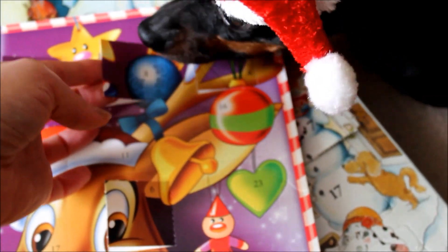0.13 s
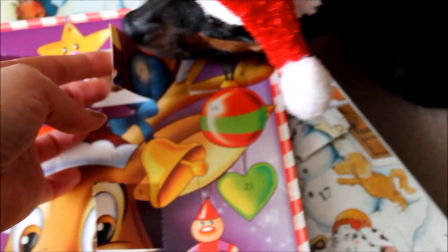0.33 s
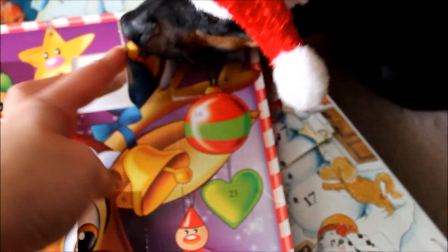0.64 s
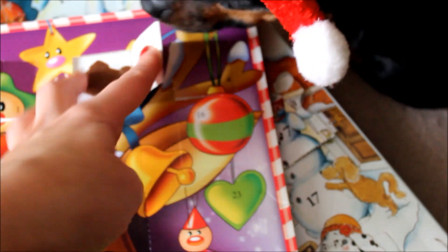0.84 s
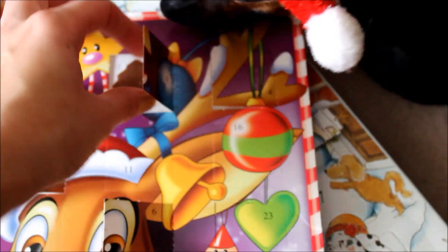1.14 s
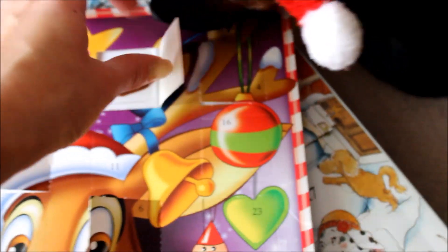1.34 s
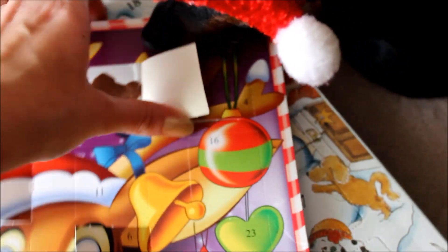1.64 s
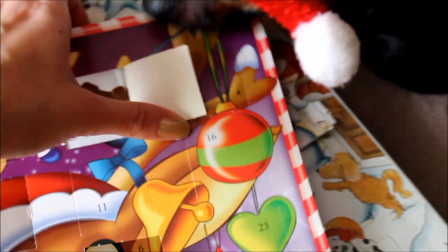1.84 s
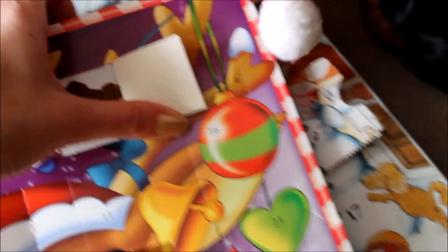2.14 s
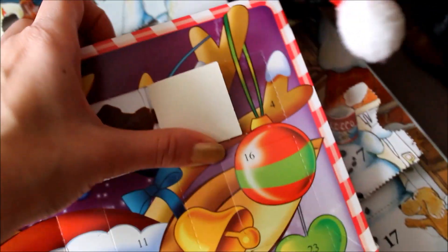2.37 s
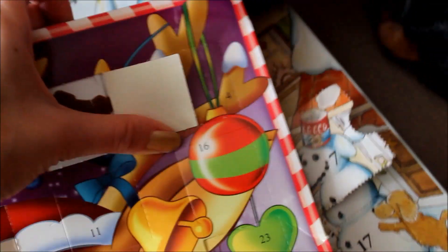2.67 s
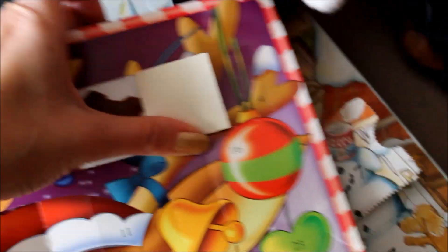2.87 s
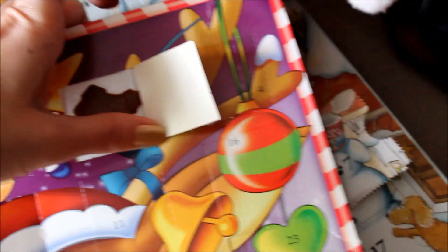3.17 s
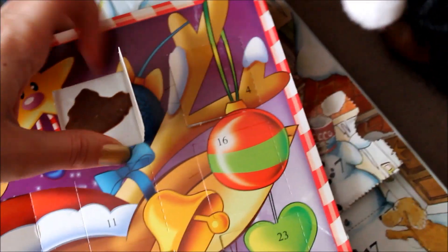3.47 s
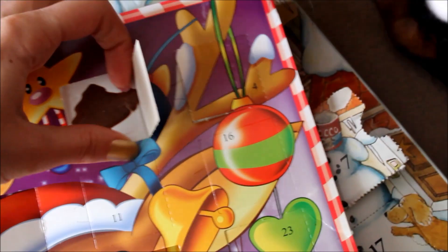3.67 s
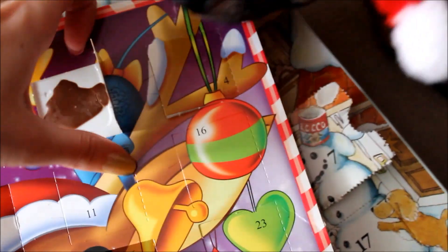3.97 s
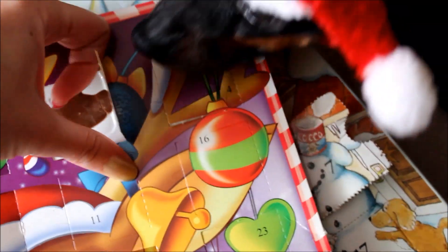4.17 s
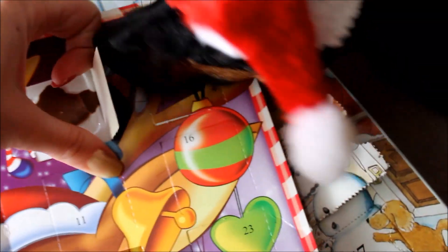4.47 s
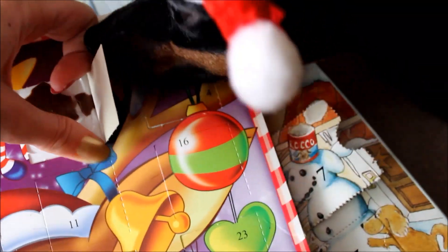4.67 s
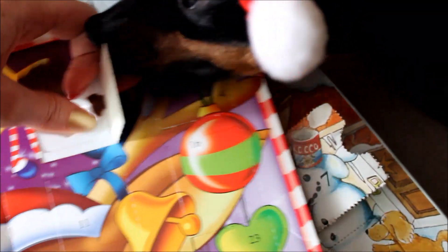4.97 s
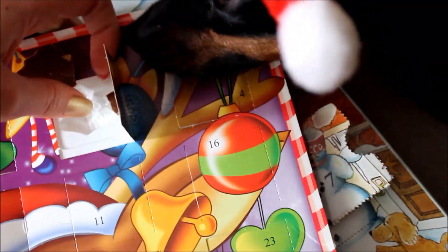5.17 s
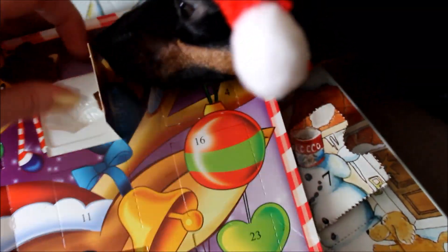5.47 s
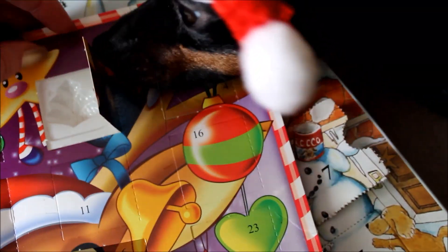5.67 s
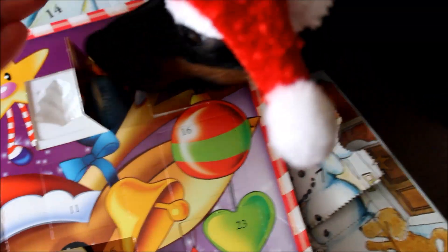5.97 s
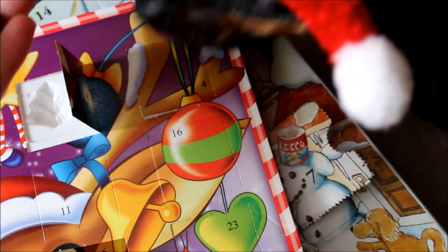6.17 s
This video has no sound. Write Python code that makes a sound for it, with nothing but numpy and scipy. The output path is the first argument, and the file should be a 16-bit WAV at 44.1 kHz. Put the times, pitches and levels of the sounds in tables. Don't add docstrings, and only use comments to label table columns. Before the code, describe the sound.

Close, dry crinkling of a thin cardboard box: perforations tick, hard creases pop loudly, then brittle plastic is bent and fades into small rustles.

```python
import sys
import numpy as np
from scipy import signal
from scipy.fft import rfft, irfft
from scipy.io import wavfile
from scipy.ndimage import uniform_filter1d

SR = 44100
rng = np.random.default_rng(int(sys.argv[2]) if len(sys.argv) > 2 else 0)


def unload_audio(sound):
    columns = np.transpose(np.atleast_2d(sound))
    steps = np.round(np.clip(columns, -1, 1) * 32767)
    wavfile.write(sys.argv[1], SR, steps.astype(np.int16))


def elevation(decibels):
    levels = np.asarray(decibels, float)
    return 10 ** (levels / 20)


N = 278271
TIME = np.arange(N) / SR

# lowest_hz, highest_hz, ring_t60_s, gain_db
BOX_PARTS = [
    (254.4, 1900, 0.038, 1),
    (1090, 4480, 0.029, -2.5),
    (4360, 12000, 0.019, -1.5),
]
# lowest_hz, highest_hz, ring_t60_s, gain_db
TRAY_PARTS = [
    (420, 1900, 0.03, 0),
    (1090, 5600, 0.022, -1.5),
    (4800, 13500, 0.019, -1),
]
# centre_hz, width_hz, level_db
BOX_MODES = [(520, 150, -12), (640, 120, 22), (1270, 67, -10.5), (1640, 270, 13.5), (2350, 180, -10)]
# start_s, card_db, film_over_card_db, clear_ring_hz, clear_ring_peak_db
FLAP_SNAPS = [(0.045, -24.5, -1, 684, -37), (0.313, 1.5, -3.5, 584, -10), (0.319, -17, 4.5, 2120, -20),
              (0.332, -19.5, 8, 640, -49), (1.09, -26, 0, 1970, -27), (1.213, -16.5, -2, 685, -38),
              (1.223, -19.5, -3, 1670, -34), (1.633, -19.5, -12, 555, -28.5),
              (1.802, -22, -20, 1410, -16.5), (1.819, -16, -14, 1430, -19.5),
              (2.016, -14, -9.5, 615, -24.5), (2.105, -10, -5.5, 1770, -14.5),
              (2.119, -12, -1.5, 2950, -15), (2.213, -0.5, -13.5, 2996, 7), (2.508, 2, -1, 2050, -6),
              (2.5085, -30, 1, 1080, -9), (2.69, -5, -1, 2680, -8), (2.737, -21, 6, 4000, -32),
              (2.758, 0, -8, 1250, -5), (2.7595, -35, 1, 640, -6), (2.759, -26, 3, 2080, 1),
              (2.953, -9.5, 9.5, 6570, -6.5), (3.037, -18, 8, 8000, -23), (3.043, -17.5, 3, 1520, -45),
              (3.16, -21, -4, 2260, -23)]
TRAY_SNAPS = [(3.399, -19, 14, 6100, -9), (3.4, -38, 2, 4100, -8), (3.484, -19.5, 0, 8060, -11.5),
              (3.892, -23, 2, 1570, -21.5), (4.028, -21, -7, 1380, -25), (4.045, -17, -2, 2300, -37),
              (4.058, -16.5, -1, 3600, -37), (4.249, -19, -17, 1900, -24), (4.325, -19.5, -14, 677, -20.5),
              (4.487, -10.5, -17, 2050, -38), (4.492, 0, 1, 5330, -2), (4.603, -18.5, -9.5, 760, -39),
              (4.627, -14, -4, 1670, -14.5), (4.631, -10, -9.5, 1700, -14), (4.645, -18.5, -9, 1560, -41),
              (4.71, -10, -21, 3000, -17), (4.804, -14, -23, 1900, -21.5), (4.838, -11.5, 0, 4500, -11),
              (4.871, -16, -20, 1730, -22), (4.915, -15.5, -4, 1060, -39), (4.932, -17, -12, 2600, -23),
              (4.953, -5, -2, 4800, -6), (5.143, -16.5, -1, 2220, -26), (5.604, -20, 1, 1550, -21.5)]
# start_s, peak_db, film_over_peak_db, clear_ring_hz
TEAR_TICKS = [(0.194, -52, -1, 1100), (0.221, -38.5, 1, 4160), (0.258, -37, 1, 4240),
              (0.471, -40, -19, 1690), (0.489, -27.5, -20, 1460), (0.513, -29, -22, 1420),
              (0.538, -36, 5, 5030), (0.565, -24.5, -13, 1500), (0.82, -30, 0, 2080),
              (0.843, -20, -18.5, 1500), (0.86, -32.5, -3, 470), (0.911, -34, 5, 430),
              (0.975, -34, 2.5, 2010), (0.991, -32, -12, 414), (1.023, -29, -19.5, 584),
              (1.236, -26, 0, 510), (1.295, -26.5, -17, 487), (1.351, -31, -17, 513), (1.374, -38, 1, 550),
              (1.503, -32, 5, 455), (1.578, -22, -6, 2000), (1.801, -19, -20, 480), (1.141, -27, -12, 1630),
              (1.161, -31, -12, 2800), (1.607, -30, -21, 573), (1.649, -36, 9, 525), (1.681, -27, -12, 745),
              (1.712, -18, -21, 1410), (1.87, -26.5, -17, 515), (1.902, -29, -14, 1580)]
FOLD_TICKS = [(2.385, -30, -15, 1010), (2.397, -33, -22, 1370), (2.404, -40, -32, 554),
              (2.412, -31, -10, 610), (2.421, -29, -26, 640), (2.438, -34, -32, 660),
              (2.452, -29.5, -9, 664), (2.466, -23, -14, 1650), (2.851, -37, 2, 646),
              (2.863, -48, -15, 720), (3.099, -25, -8, 1530), (3.106, -26, -4, 1530),
              (3.167, -23, -7, 1300), (3.174, -23.5, -6, 645), (3.305, -52, 4, 3460),
              (3.34, -23.5, -26, 1570), (3.538, -27.5, -5.5, 1620), (3.655, -31.5, -10, 1610),
              (3.689, -35, 0, 1520), (3.713, -43, -8, 840), (3.771, -23.5, -3, 1390),
              (3.776, -31.5, -2, 575), (3.902, -24, -16, 646), (3.916, -28, -11, 1820),
              (4.097, -26, -26, 1200), (4.148, -26, 3.5, 1270), (4.186, -25, -14, 1630),
              (4.21, -29, -22, 598)]
TRAY_TICKS = [(4.283, -27, -11, 1570), (4.305, -28, -20, 1470), (4.33, -23, 2, 1600),
              (4.347, -21.5, -7, 1790), (4.43, -23, -6, 820), (4.451, -29, -11, 1040),
              (4.677, -37, -15, 960), (4.699, -25.5, -9, 725), (4.726, -19, -17, 2500),
              (4.612, -27, -14, 2500), (4.944, -25, -10, 2000), (4.885, -16, -13, 1650),
              (4.971, -24, -10, 2740), (4.993, -29, -12, 1600), (5.025, -28.5, -12, 1570),
              (5.04, -33, 8, 560), (5.058, -21.5, -6, 1400), (5.127, -28, -8, 1270),
              (5.351, -29.5, 6, 1350), (5.386, -23.5, -0.5, 1560), (5.424, -23.5, -22, 573),
              (5.49, -23, -11, 1270), (5.52, -26, -13, 813), (5.657, -28, -20, 520), (5.548, -29, -4, 1200),
              (5.58, -30, -10, 1500), (4.999, -30, -10, 1570), (5.709, -29.5, -10, 1590),
              (5.745, -31, -7, 488), (5.754, -34, -15, 549), (6.28, -47, 12, 4190),
              (6.294, -38.5, 11.5, 8500)]
# start_s, peak_db, film_over_peak_db, clear_ring_hz
WARNING_TICKS = [(.053, -39, 6.5, 700), (.276, -50, 8, 7660), (1.787, -35, 6, 3510), (2.175, -42, 3, 520),
                 (2.486, -21.5, -3, 1270), (2.475, -28, -19, 1670), (2.731, -38, 0, 2480),
                 (2.943, -28, -2, 1520), (4.229, -36, -3, 2080), (4.466, -47, 11, 640),
                 (4.473, -48, 6, 9000), (4.611, -36, -19, 1270), (4.947, -29, -5, 1350)]
# peak_s, rise_s, fall_s, level_db, centre_hz
SCRAPES = [(.55, .017, .019, -43, 3000), (.86, .04, .1, -48, 4000), (1.103, .011, .016, -28, 2000),
           (1.563, .014, .007, -27, 2800), (2.745, .006, .007, -21, 2600), (3.166, .012, .015, -33, 1600),
           (3.308, .006, .008, -43, 5900), (3.952, .016, .024, -35, 3600), (4.145, .019, .021, -47, 4000),
           (4.899, .0048, .0036, -29.5, 2900), (5.39, .02, .025, -42, 2960), (5.435, .018, .018, -37, 600),
           (5.552, .012, .014, -41, 5500), (1.41, .02, .06, -50, 3000), (2.53, .012, .014, -31, 2000),
           (4.33, .012, .028, -39, 900), (5.59, .02, .04, -39, 1500), (5.77, .02, .025, -51, 390),
           (3.35, .006, .04, -41, 990), (4.12, .025, .03, -47, 8900), (3.81, .015, .035, -46, 5000),
           (2.08, .03, .02, -44, 3000), (1.25, .02, .04, -44, 2500), (4.51, .008, .018, -33, 5000),
           (1.545, .018, .02, -33, 1200), (1.14, .015, .01, -39, 1800), (1.165, .01, .02, -43, 2200),
           (5.555, .015, .025, -41, 900), (5.67, .015, .02, -43, 1200), (1.585, .01, .025, -39, 800),
           (1.83, .02, .03, -38, 600), (4.65, .015, .02, -38, 1100), (4.925, .03, .02, -38, 1800),
           (5.713, .004, .008, -42, 2500)]
# peak_s, rise_s, fall_s, level_db, centre_hz
SINGING_DRAGS = [(1.105, .02, .02, -37, 520), (1.4, .04, .03, -41, 500), (1.04, .015, .019, -46, 250),
                 (5.44, .04, .04, -55, 170), (4.12, .03, .04, -54, 200), (4.35, .05, .05, -55, 170),
                 (4.5, .01, .03, -48, 170), (4.635, .01, .03, -46, 240), (1.105, .012, .014, -35, 2200),
                 (1.62, .06, .06, -51, 200), (.885, .025, .022, -50, 4650), (1.44, .05, .05, -48, 1750),
                 (3.955, .03, .03, -43, 1700), (2.08, .02, .015, -44, 1600), (1.83, .04, .04, -49, 300),
                 (1.545, .02, .012, -36, 540), (1.561, .008, .008, -30, 1750),
                 (5.445, .008, .008, -40, 450), (5.58, .04, .04, -48, 500), (5.6, .09, .09, -53, 200)]
# time_s, effort_db, brightness_db
HANDLING = [(0.0, -56, -1), (.42, -58, -1), (.55, -53, -1), (.76, -54, -1), (.86, -50, -2), (1.45, -46, -3),
            (1.6, -41.5, -1), (1.92, -43, 0), (2.2, -49, -3), (2.5, -49, -4), (3.7, -50, -2),
            (3.9, -46, -2), (5.1, -47, -2), (5.25, -51, -1), (5.4, -49, -2), (5.72, -51, -1),
            (5.95, -55, -1), (6.3, -54, -1)]
RUSTLE_DB = [
    -2.5,
    -1.5,
    -2,
]
RUSTLE_TILT = [
    -0.9,
    0.1,
    0.9,
]
# centre_s, half_length_s
LIFTS = [(1.006, .022), (1.35, 0.038), (3.745, 0.02), (4.013, 0.0054), (4.576, 0.022), (0.163, 0.015),
         (3.263, 0.028), (4.77, .03), (5.47, .012), (2.6, .02)]
# frequency_hz, level_db
AIR_SPECTRUM = [(12, -50.5), (20, -18), (71, -5), (372, -2), (599, -1.5), (690, 2), (1110, -3), (1400, -6),
                (1690, -4.5), (3620, -10.5), (10800, -20), (14700, -45.5), (16500, -60)]
# time_s, over_hum_level_db
HUM_SWELL = [(0, -9), (3.4, -7), (4.2, 3), (4.9, -5), (5.4, 6), (6.3, 4)]


def snaps(table, parts=BOX_PARTS):
    clear_t60_s, clear_q, widest_hz = 0.011, 2.45, 2100
    crack_t60_s, crack_db, click_db = 0.003, 4, 14
    t = np.arange(2048) / SR
    out = np.zeros(N + len(t))
    bodies = [passband(lo, hi, order=3) for lo, hi, _, _ in parts]
    shakes = rng.standard_normal((len(table), 4, len(t)))
    for (s, card_db, film_db, clear_hz, clear_db), shake in zip(table, shakes):
        thud_db = -15 + 0.67 * card_db - 0.46 * max(film_db, -9)
        part_db = thud_db, card_db, card_db + film_db
        half_hz = min(clear_hz / clear_q, widest_hz) / 2
        clear = passband(clear_hz - half_hz, clear_hz + half_hz, order=3)
        rings = [(clear, clear_t60_s, clear_db)]
        for body, (_, _, t60, gain_db), db in zip(bodies, parts, part_db):
            rings.append((body, t60, gain_db + db))
        i = int(s * SR)
        for (body, t60, db), noise in zip(rings, shake):
            decay = elevation(-60 * t / t60) + elevation(crack_db - 60 * t / crack_t60_s)
            push = noise * decay + elevation(click_db) * (t == 0)
            ring = signal.sosfilt(body, push)
            out[i:i + len(t)] += elevation(db) * ring / np.abs(ring).max()
    return out[:N]


def ticks(table, parts=BOX_PARTS):
    film_from_hz = BOX_PARTS[2][0]
    creases = []
    for s, db, film_db, hz in table:
        clear_db = db - 6 + film_db * (hz > film_from_hz)
        creases.append((s, db - 3.5, film_db + 6, hz, clear_db))
    return snaps(creases, parts)


def scrapes():
    grit = level(grains(5000, 2.8), 0) + elevation(5) * rng.standard_normal(N)
    grit = band(grit, 110, 7000, order=1) * elevation(2.6 * walk(300))
    out = np.zeros(N)
    drags = [(*row, 3.15) for row in SCRAPES] + [(*row, 0.12) for row in SINGING_DRAGS]
    for s, rise, fall, db, hz, width in drags:
        width_hz = np.clip(width * hz, 110, 8000)
        lo_hz = np.sqrt(hz ** 2 + width_hz ** 2 / 4) - width_hz / 2
        i, j = int((s - 3 * rise) * SR), int((s + 3 * fall) * SR)
        t = TIME[i:j]
        swell = np.exp(-((t - s) / np.where(t < s, rise, fall)) ** 2)
        patch = rng.standard_normal(128) + 6 * (TIME[:128] == 0)
        patch *= elevation(-60 * TIME[:128] / 0.0021)
        drag = band(grit[i:j], lo_hz, lo_hz + width_hz, order=2)
        out[i:j] += swell * level(signal.lfilter(patch, 1, drag), db)
    return out


def rustle(count=5):
    s, effort_db, bright_db = np.transpose(HANDLING)
    shared = level(grains(400, 2.7), -3.5)
    flicker_db = 2.0 * walk(70) + slack()
    out = 0
    for (lo, hi, _, _), part_db, tilt in zip(BOX_PARTS, RUSTLE_DB, RUSTLE_TILT):
        db = effort_db + part_db + tilt * bright_db
        rub = shared + level(grains(lo / 4, 1.66), 0.61) + rng.standard_normal(N)
        body = sum(elevation(mode_db) * band(rub, hz - w / 2, hz + w / 2, order=1) for hz, w, mode_db in BOX_MODES)
        rub = level(band(rub, 100, 4500, order=1), 0) + level(body, -8)
        edges = np.geomspace(0.91 * lo, hi, count + 1)
        patches = np.zeros(N)
        for k in range(count):
            patches += (-1) ** k * elevation(2.4 * walk(22)) * band(rub, *edges[k:k + 2], order=1)
        out = out + level(patches, 0) * elevation(np.interp(TIME, s, db) - 3.0 + flicker_db)
    return out


def slack():
    limit_db, loss_per_db, recovery_s = -14.5, -0.09, 0.14
    out = np.zeros(N)
    for s, half_s in LIFTS:
        out += -8 * np.exp(-((TIME - s) / half_s) ** 4)
    for s, card_db, _, _, clear_db in FLAP_SNAPS + TRAY_SNAPS:
        excess_db = max(max(card_db, clear_db) - limit_db, 0)
        out += loss_per_db * excess_db * (TIME > s) * np.exp(-(np.abs(TIME - s) / recovery_s) ** 2)
    return out


def room(x):
    room_db, t60_s, top_t60_s, wall_s = -18.5, 0.13, 0.11, 0.015
    t = np.arange(int(.4 * SR)) / SR
    build = np.where(t < wall_s, elevation(-6.5), 1) * (t > .003)
    low = band(rng.standard_normal(len(t)), 92, 2500, order=1) * elevation(-60 * t / t60_s)
    top = band(rng.standard_normal(len(t)), 2900, 27000, order=1) * elevation(-10.5 - 60 * t / top_t60_s)
    tail = build * (low + top)
    return signal.fftconvolve(x, elevation(room_db) * tail / np.sqrt(np.sum(tail ** 2)))[:N]


def air():
    air_db, hum_hz, hum_db = -57.5, 78, -78
    hz, db = np.transpose(AIR_SPECTRUM)
    f = np.arange(N // 2 + 1) * SR / N + 1
    tone = irfft(rfft(rng.standard_normal(N)) * elevation(np.interp(np.log(f), np.log(hz), db)), N)
    hum = level(band(rng.standard_normal(N), hum_hz - 6, hum_hz + 6, order=1), hum_db)
    hum *= elevation(np.interp(TIME, *np.transpose(HUM_SWELL)))
    return level(tone, air_db) * elevation(0.14 * walk(2.7)) + hum


def grains(rate, spread_db):
    size = elevation(spread_db * np.minimum(rng.exponential(size=N), 3))
    return (rng.random(N) < rate / SR) * rng.choice([-1, 1], N) * size


def walk(rate):
    k = int(SR / rate)
    held = np.repeat(rng.standard_normal(N // k + 1), k)
    return uniform_filter1d(held, k)[:N] * np.sqrt(1.5)


def level(x, db):
    return x * elevation(db) / np.sqrt(np.mean(x ** 2))


def band(x, lo_hz, hi_hz, order=2):
    return signal.sosfilt(passband(lo_hz, hi_hz, order), x)


def passband(lo_hz, hi_hz, order):
    return signal.butter(order, [lo_hz, min(hi_hz, .45 * SR)], "bandpass", fs=SR, output="sos")


def scene():
    near = snaps(FLAP_SNAPS) + snaps(TRAY_SNAPS, TRAY_PARTS)
    near += ticks(TEAR_TICKS) + ticks(WARNING_TICKS) + ticks(FOLD_TICKS) + ticks(TRAY_TICKS, TRAY_PARTS)
    near += scrapes()
    hands = band(near + room(near) + rustle(), 153, 11500)
    hands += band(band(near, 200, 3500) * rng.standard_normal(N), 30, 266) * elevation(-16.5)
    return (hands + air())[None]


def low_pass(x):
    return signal.sosfilt(signal.butter(12, 16850, fs=SR, output="sos"), x)


def record(dry):
    hiss = level(band(rng.standard_normal(N), 8000, 15300, order=6), -75.5)
    mix = np.clip(dry + hiss, -1, 1)
    return low_pass(mix)


dry = scene()
out = record(dry)
unload_audio(out)
```